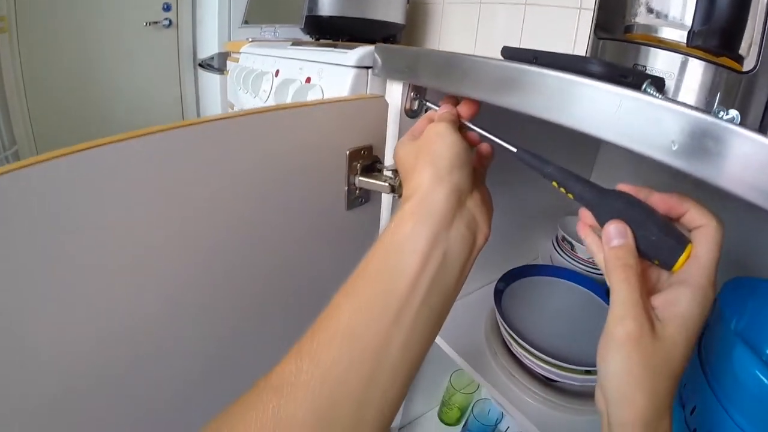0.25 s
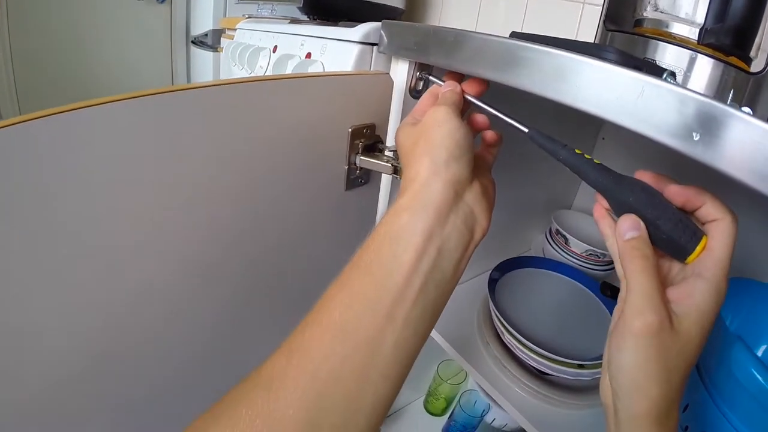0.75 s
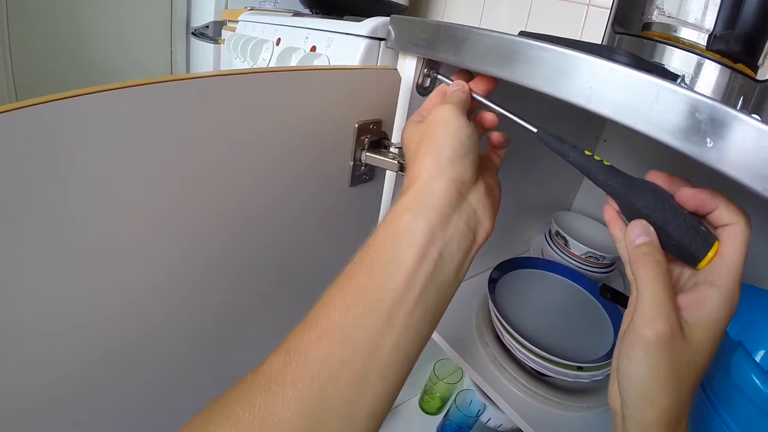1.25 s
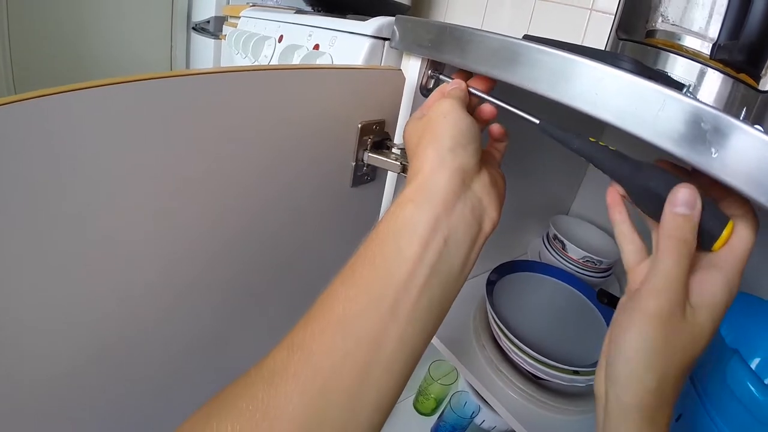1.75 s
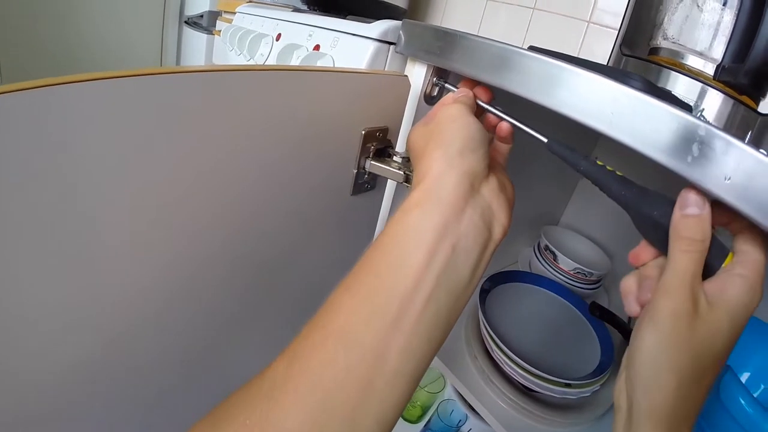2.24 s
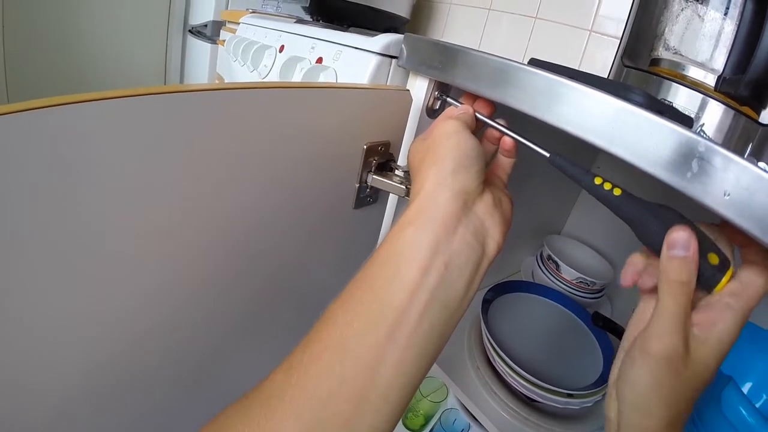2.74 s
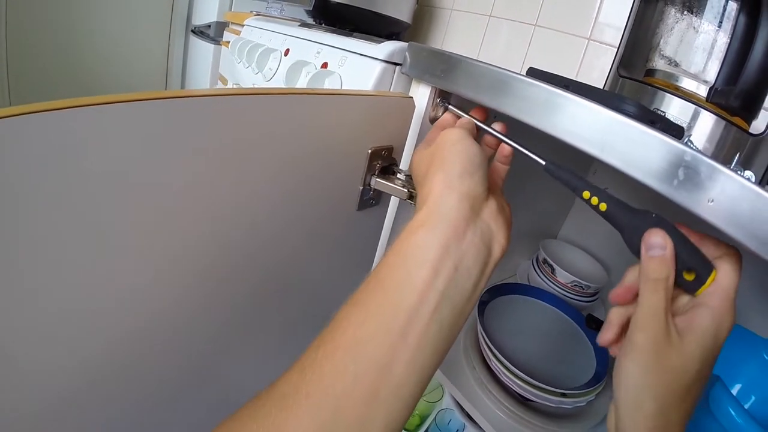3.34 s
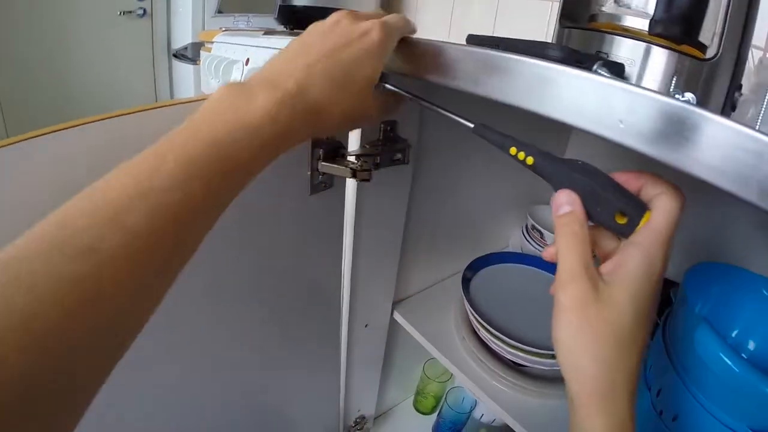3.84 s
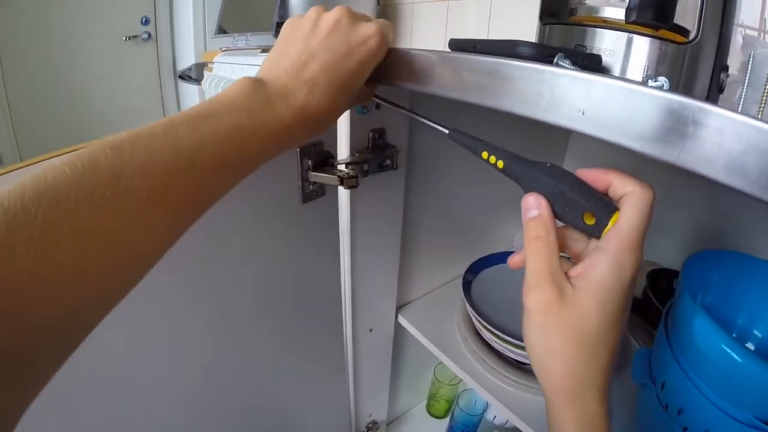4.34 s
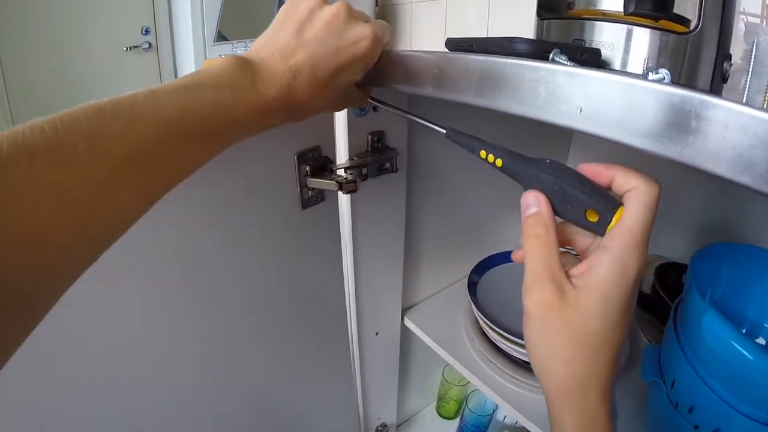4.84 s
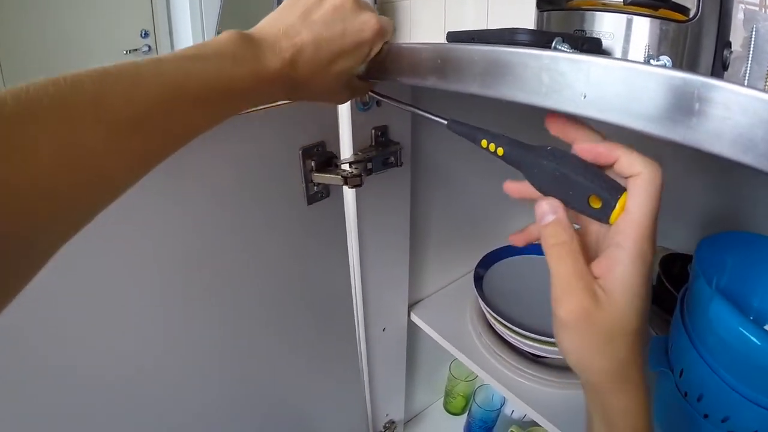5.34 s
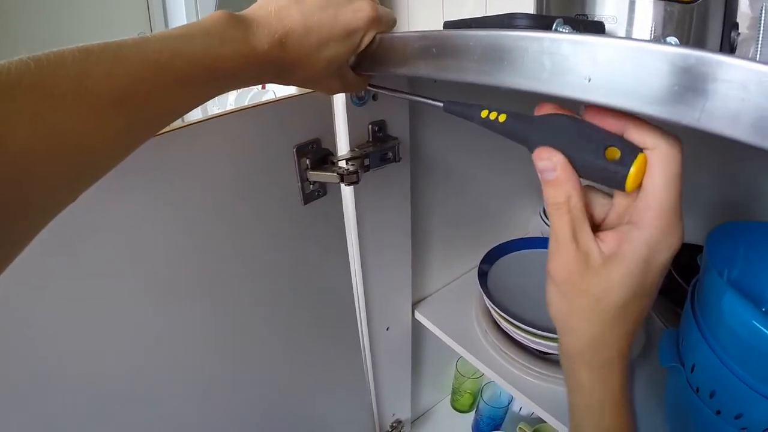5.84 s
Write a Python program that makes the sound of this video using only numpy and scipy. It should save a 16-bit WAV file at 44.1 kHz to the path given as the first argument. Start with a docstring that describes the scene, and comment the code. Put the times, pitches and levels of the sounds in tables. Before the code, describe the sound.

In a small kitchen, a screwdriver slips and catches in a hinge screw, setting a loose cupboard door clacking in quick uneven knocks, woody and metallic. After two seconds it stops; a solid double knock comes near three seconds, then a few weaker taps and soft rubs of hands. Low rumbling room noise and a faint wavering appliance hum lie behind. Close, head-worn small camera, single channel, slightly dulled treble.

```python
"""Knocks of a loose cupboard door and hinge come first, as a screwdriver tip slips and catches in a hinge screw.
Each knock is a sum of damped modes with blurred noise, a snap of steel and weaker rebounds.
Further short bright cracks of noise sound, some alone, some on top of a knock; rubbing hands are grainy noise.
Behind them lie the room's echoes, coloured kitchen noise with a heaving bass, a hum and faint whines.
A small camera on the worker's head hears it all and cuts the top of the treble."""
import sys
import numpy as np
from scipy import signal
from scipy.fft import rfft, irfft
from scipy.io import wavfile
from scipy.ndimage import uniform_filter1d

SR = 44100
rng = np.random.default_rng(int(sys.argv[2]) if len(sys.argv) > 2 else 0)


def pcm_store(signal):
    """Save signal as 16-bit PCM."""
    levels = np.round(np.clip(np.atleast_2d(signal), -1, 1) * 32767)
    wavfile.write(sys.argv[1], SR, levels.astype(np.int16).T)


N = 268569


def undb(db):
    """Amplitude ratio: 20 dB is a factor of ten."""
    return 10 ** (np.asarray(db) / 20)


def unit(x):
    """Normalisation to an rms amplitude of 1."""
    return x / np.sqrt(np.mean(x ** 2))


def band(x, hz, width_hz):
    """Resonance: a second-order peak whose Q is its frequency over its width."""
    b, a = signal.iirpeak(hz, hz / width_hz, fs=SR)
    return signal.lfilter(b, a, x)


def curve(rows):
    """Linear interpolation of a (t/s, value) table at every sample."""
    return np.interp(np.arange(N) / SR, *np.transpose(rows))


def walk(rate_hz):
    """Slow random modulation: held random values smoothed by two moving averages, rms 1."""
    hold = int(SR / rate_hz)
    steps = np.repeat(rng.standard_normal(N // hold + 1), hold)
    smooth = uniform_filter1d(uniform_filter1d(steps, hold), hold)
    return unit(smooth[:N])


def add(out, s, x):
    """Superposition: x is summed into out from time s."""
    i = int(s * SR)
    out[i:i + len(x)] += x


def knocks():
    """Modal synthesis: a blow excites damped modes of every part; weaker rebounds re-excite the dense ones."""
    # knocks: t/s, door panel peak level/dB, then peak level relative to it: hinge cup/dB, hinge arm/dB
    blows = [(0.001, -25, -5, -18), (0.055, -21, 0.5, -4), (0.179, -13, -0.5, -8.5),
             (0.195, -16.5, -31, -5), (0.239, -14.5, 0.5, -16), (0.253, -11, -1.5, -12),
             (0.36, -15.5, -5, -10), (0.549, -18.5, -1.5, -6.5), (0.619, -21, -3, -27),
             (0.746, -31, 6, -20), (0.752, -15.5, -2, -9), (0.84, -18, -2.5, -8.5),
             (1.081, -25.5, -6.5, -15), (1.115, -19, -2, -21), (1.129, -27, 5.5, -12),
             (1.173, -15.5, -0.5, -6), (1.253, -31, 0, -11.5), (1.377, -13, -4, -15),
             (1.517, -32.5, 1, -11), (1.532, -17.5, -1, -5.5), (1.631, -16, -16, -29),
             (1.765, -16, -10.5, -36), (1.887, -26.5, -4, -20.5), (1.96, -38, -10, -5.5),
             (2.145, -42.5, -23, -26), (2.846, -14.5, -8.5, -43), (2.87, -26, -4, -17),
             (2.884, -39.5, -10, -8), (3.017, -33.5, -8.5, -25), (3.048, -33.5, -6, -15.5),
             (3.228, -22, -39, -31), (3.691, -26.5, -11, -23), (3.705, -37, -24, -16), (3.724, -44, 5, -5),
             (3.937, -40, -10, -20), (5.004, -43, -7, -14), (5.174, -45.5, -10, -16),
             (5.494, -46, -4.5, -20)]
    # modes of cupboard, door and hinge: f/Hz, width/Hz, level/dB (relative, multiplied by the width below)
    modes = [(252, 39, -2), (258, 80, -22.5), (367.5, 23.3, -6), (440.4, 6.3, -8.5), (542.6, 21, -3.5),
             (596, 36, 3), (666, 65, -2.5), (754.7, 46, 4.5), (808, 8.1, -4), (866, 34, -8.5),
             (923, 110, 2), (991.3, 64, 2), (950, 15, -20.5), (1143.3, 44, -1.5), (1170, 14, -27),
             (1299, 23, 12.5), (1477, 57, 22.5), (1610, 41, -12), (1676, 60, 20), (1805, 80, 18),
             (2015, 245, 17), (2143, 65, 5), (2340, 41, -30), (2717, 82, -17), (2887, 38, -14),
             (3154, 89, -16.5), (4280, 83, -37), (4510, 280, -42), (5660, 45, -44), (6580, 450, -33)]
    # edges of the bands of boom, door panel, hinge cup, hinge arm, screw and tip tick: f/Hz
    edges_hz = [165, 500, 1250, 2400, 3700, 5200, 7800]
    boom_db = -14.5  # relative to the door panel
    screw_db, tick_db, snap_db = -10, -16, -27.5  # relative to the hinge arm
    swell_ms = 11.1  # swell time for a band whose upper edge is 1 kHz
    soft_ms_per_db = 0.02  # the duller the contact (weaker hinge arm), the longer the push
    scatter_db = 3.0  # spread of the mode levels from knock to knock
    dense_db, dense_t60 = -8.5, 0.092  # blurred modes: level relative to the clear ones, decay in s
    rattle_db, rebound_t60 = -27.5, 0.018  # rebounds: level, decay in s

    t = np.arange(int(SR // 3)) / SR
    hz, width, mode_db = np.transpose(modes)
    turn = 2 * np.pi * np.outer(hz, t)
    fade = np.exp(-np.pi * np.outer(width, t))
    sines, cosines = fade * np.sin(turn), fade * np.cos(turn)
    part = np.searchsorted(edges_hz, hz) - 1
    filters = [signal.butter(3, edge, "band", fs=SR, output="sos") for edge in zip(edges_hz, edges_hz[1:])]

    out = np.zeros(N + SR)
    for s, db, cup_db, arm_db in blows:
        scatter = rng.standard_normal(len(hz))
        phase = 2 * np.pi * rng.random(len(hz))
        noise = rng.standard_normal(len(t))
        weight = width * undb(mode_db + scatter_db * scatter)
        # three rebounds, each 9 to 49 ms after the blow
        since_rebound = t - 0.04 * (0.22 + rng.random((3, 1)))
        rebounds = (since_rebound > 0) * undb(-60 * abs(since_rebound) / rebound_t60)
        rattle = undb(rattle_db) * np.sum(rebounds, axis=0)
        part_levels = (boom_db, 0, cup_db, arm_db, arm_db + screw_db, arm_db + tick_db)
        ring = 0
        for k, part_db in enumerate(part_levels):
            own = weight * (part == k)
            # bending waves spread slowly in the bass: low parts swell later
            rise_s = swell_ms / edges_hz[k + 1] + soft_ms_per_db * abs(arm_db) * 1e-3
            swell = np.sin(np.pi / 2 * np.minimum(t / rise_s, 1)) ** 2
            clear = (own * np.cos(phase)) @ sines + (own * np.sin(phase)) @ cosines
            # countless weak modes between the clear ones blur into a fading noise
            decay = undb(-60 * np.maximum(t - rise_s, 0) / dense_t60)
            dense = signal.sosfilt(filters[k], noise * (decay + rattle))
            body = (unit(clear) + undb(dense_db) * unit(dense)) * swell
            ring = ring + undb(part_db) * body / abs(body).max()
        blow = undb(db) * (ring + snap(noise, arm_db + snap_db))
        add(out, s, echoed(blow))
    return out[:N]


def snap(noise, peak_db):
    """Impact of steel on steel: broad resonance at 11.5 kHz driven by noise with a 9 ms decay time."""
    t60, hz = 0.009, 11500.0
    fading = noise * undb(-60 * np.arange(len(noise)) / SR / t60)
    crack = band(band(fading, hz, hz), hz, hz)
    return undb(peak_db) * crack / abs(crack).max()


def cracks():
    """Damped resonance: short bright cracks of noise, some alone, some on top of a knock."""
    # short bright cracks: t/s, peak level/dB (before the echoes)
    crack_rows = [(0.7804, -65), (0.8624, -58), (1.1134, -66), (1.1288, -57), (1.3804, -48), (4.94, -52)]
    out = np.zeros(N + SR)
    for s, peak_db in crack_rows:
        add(out, s, echoed(snap(rng.standard_normal(SR // 20), peak_db)))
    return out[:N]


def rubs():
    """Friction: dense uneven slips drive a resonance, swelling and fading with each slide."""
    # skin and steel sliding: t/s, length/s, level/dB (rms before the swell and fade), centre f/Hz, width/Hz
    slides = [(1.101, 0.022, -42, 1490, 1460), (1.96, 0.05, -60, 2970, 3000),
              (2.775, 0.059, -60, 2290, 1510), (3.048, .1, -55, 1050, 1200),
              (3.081, 0.052, -60.5, 3220, 2000), (3.073, 0.1, -72, 6450, 2000),
              (3.742, 0.11, -53, 935, 1020), (3.756, 0.092, -60.5, 3220, 1190),
              (3.921, 0.04, -57, 1950, 1990), (4.461, 0.3, -61, 1196, 200), (5.603, .45, -69, 1020, 200),
              (5.831, 0.13, -69, 2480, 150), (5.978, .1, -73, 1990, 200)]
    grain_db = 4.0  # mean of the random boost of single slips
    out = np.zeros(N)
    for s, length, db, hz, width_hz in slides:
        n = int(length * SR)
        grain = undb(grain_db * rng.exponential(size=SR // 2))
        slips = rng.standard_normal(SR // 2) * grain
        rub = band(band(slips, hz, width_hz), hz, width_hz)[:n]
        add(out, s, undb(db) * unit(rub) * np.hanning(n) ** .5)
    return out


def room():
    """Reverberation of tiles and cupboards: octave bands of noise, each with its own exponential decay."""
    # reverberation time against frequency: f/Hz, t60/s
    decay_rows = [(150, 0.62), (500, 0.075), (1500, 0.21), (4000, 0.24), (10000, 0.027)]
    delay_s = 0.0059  # silence before the tail, and also the length of its rise
    t = np.arange(SR // 2) / SR
    hz, t60 = np.transpose(decay_rows)
    tail = np.zeros(len(t))
    for f in 125 * 2. ** np.arange(7):
        band_t60 = np.interp(np.log(f), np.log(hz), t60)
        tail += band(rng.standard_normal(len(t)), f, f) * undb(-60 * t / band_t60)
    tail = tail * np.clip(t / delay_s - 1, 0, 1)
    return tail / np.sqrt(np.sum(tail ** 2))


def echoed(x):
    """Convolution with a freshly drawn noise tail each time, so no one tail colours every knock."""
    room_db = -9.5  # tail energy relative to the direct sound
    tail = signal.fftconvolve(x, room())
    return undb(room_db) * tail + np.pad(x, (0, len(tail) - len(x)))


def kitchen_air():
    """Spectral shaping of noise: air and far machines, the bass heaving as the body shifts."""
    # noise spectrum: f/Hz, relative level per Hz/dB
    spectrum = [(12, -31), (20, 3.5), (32, -3.5), (112, -5), (370, -14), (425, -12), (462, -17),
                (546, -14.5), (828, -16), (1060, -17.5), (1570, -25), (2450, -27.5), (2730, -29.5),
                (5040, -35), (15300, -50.5)]
    # rms level of the bass: t/s, level/dB
    bass_levels = [(0.05, -49), (0.21, -54), (0.25, -39.5), (0.4, -51.5), (2.04, -50.5), (2.62, -59.5),
                   (2.67, -53), (2.82, -58), (2.85, -47.5), (3.0, -53), (3.07, -42.5), (3.56, -56),
                   (3.98, -48), (4.27, -58), (4.36, -53), (5.98, -54.5), (6.0, -51)]
    hz, db = np.transpose(spectrum)
    f = np.fft.rfftfreq(N, 1 / SR) + 1  # 1 Hz up, to keep the logarithm finite
    gain = undb(np.interp(np.log(f), np.log(hz), db))
    air = unit(irfft(rfft(rng.standard_normal(N)) * gain, N)) * undb(-51)
    bass = signal.sosfilt(signal.butter(2, 130, fs=SR, output="sos"), air)
    return air - bass + unit(bass) * undb(curve(bass_levels))


def hum():
    """Amplitude and phase modulation: an appliance tone at 712 Hz wavers slightly in both."""
    # rms level: t/s, level/dB
    hum_levels = [(0, -55), (2.2, -64), (3.6, -60.5), (4.2, -68.5), (6.09, -75)]
    t = np.arange(N) / SR
    level = undb(curve(hum_levels) + walk(4))
    return np.sqrt(2) * level * np.sin(2 * np.pi * 712 * t + walk(5) / 4)


def whine():
    """Pure tones: thin steady sines of constant amplitude."""
    # tones: f/Hz, rms level/dB
    tones = [(6595, -97), (12645, -99), (13130, -102)]
    t = np.arange(N) / SR
    return np.sqrt(2) * sum(undb(db) * np.sin(2 * np.pi * hz * t) for hz, db in tones)


def scene():
    """Superposition of the work sounds and the kitchen background, in one channel."""
    work = knocks() + cracks() + echoed(rubs())[:N]
    background = kitchen_air() + hum() + whine()
    return (work + background)[None]


def record(dry):
    """Low-pass filtering: the camera cuts steeply above 15.3 kHz."""
    return signal.sosfilt(signal.ellip(8, .2, 70, 15300, fs=SR, output="sos"), dry)


dry = scene()
out = record(dry)
pcm_store(out)
```